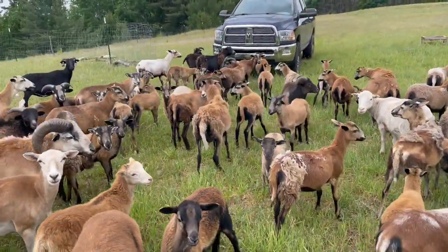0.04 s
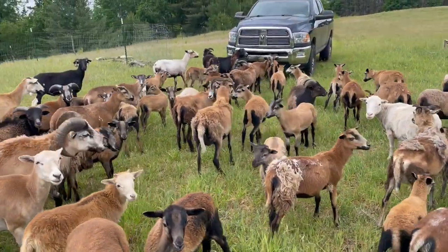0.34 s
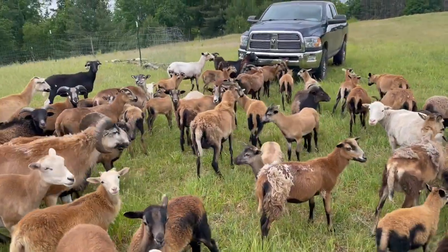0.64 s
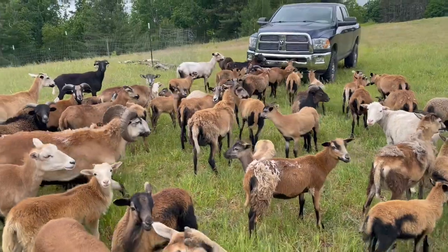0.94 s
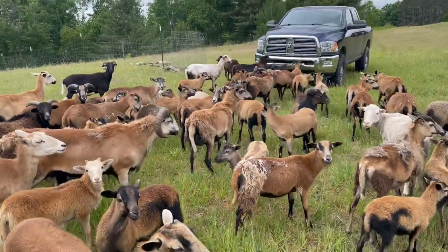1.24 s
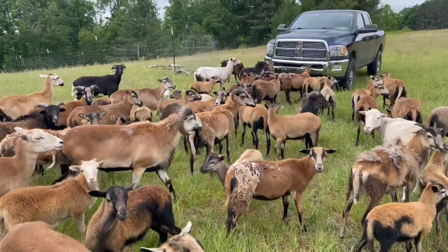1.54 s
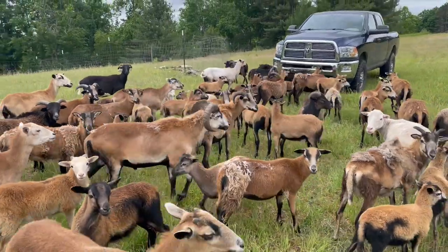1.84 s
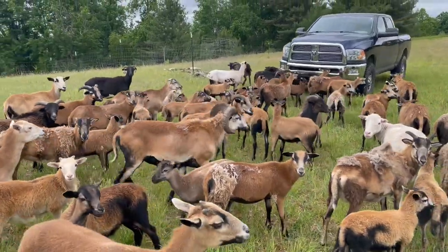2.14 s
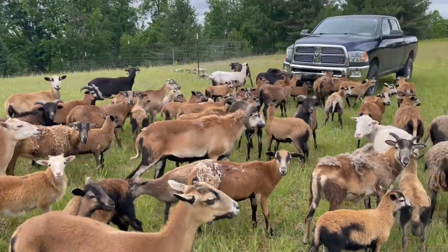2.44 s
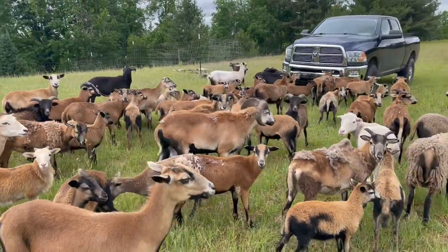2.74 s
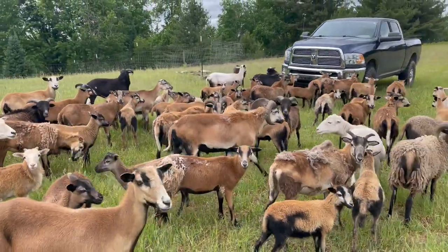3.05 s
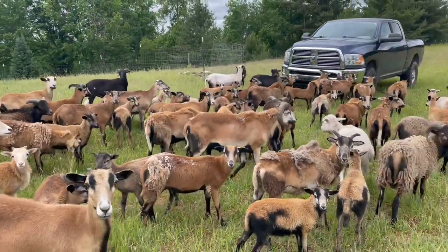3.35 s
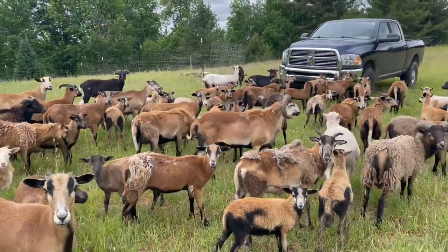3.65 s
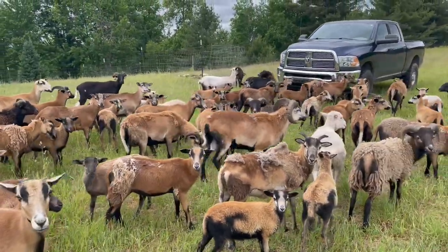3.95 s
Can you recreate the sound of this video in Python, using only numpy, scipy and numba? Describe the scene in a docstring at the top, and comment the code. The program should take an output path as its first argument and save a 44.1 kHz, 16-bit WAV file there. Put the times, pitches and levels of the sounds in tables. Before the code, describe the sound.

Sheep call across an open field as wind buffets the microphone lightly. Smooth and hoarse bleats come first, with distant grunts and a lamb, before a near ewe gives a loud, wavering baa and a far lamb answers faintly.

```python
"""A pasture with a flock of sheep. A near ewe gives a loud, quavering baa and a far lamb answers.
Before that, a ewe bleats two smooth held notes, one fading and one arching, a hoarse ewe rasps, a lamb
stutters and grunts come from further back. Each voice is a train of vocal-fold pulses ringing a throat.
Wind flutters on the microphone in small eddies, over a faint background hiss."""
import sys
import numpy as np
from scipy import signal
from scipy.fft import rfft, irfft
from scipy.io import wavfile
from scipy.ndimage import uniform_filter1d
from numba import njit

SR = 44100
rng = np.random.default_rng(int(sys.argv[2]) if len(sys.argv) > 2 else 0)


def wrap_up_sound(samples):
    """Save the sound to the file named by the first command line argument, as 16-bit audio."""
    columns = np.atleast_2d(samples).T
    # keep every value between -1 and 1, then stretch to whole-number steps
    tamed = np.clip(columns, -1, 1)
    steps = np.round(tamed * 32767).astype(np.int16)
    wavfile.write(sys.argv[1], SR, steps)


N = 176400
t = np.arange(N) / SR
BIN_HZ = np.arange(N // 2 + 1) * SR / N

# near and hoarse ewes' quavers: t/s, starting f/Hz, final f/Hz, level/dB, brightness/dB, softening/dB
NEAR_QUAVERS = [(2.995, 140.2, 166.8, -37.5, -6.5, -5), (3.038, 180.5, 168.5, -41.5, 6.5, 7),
                (3.08, 179.2, 214.6, -32, -8, 5), (3.115, 168, 223.8, -34, -1, 16),
                (3.212, 181.9, 221.9, -31, -3.5, 10), (3.285, 202.6, 208.8, -30, -9.5, 7),
                (3.318, 185, 222.7, -30.5, -6.5, 7), (3.385, 191, 223.4, -30.5, -7, 5.5),
                (3.462, 184, 215.4, -31, -5.5, 4.5), (3.54, 179.6, 203.2, -34, -5, 0.5),
                (3.63, 165.3, 175, -37, -6.5, -7)]
HOARSE_QUAVERS = [(.113, 147.2, 127, -34, -7, -2), (.185, 128.1, 126.4, -37.5, -6, 6),
                  (.235, 170.4, 166, -39, -11.5, -1), (.282, 167.9, 180.7, -34, -11, -2.5),
                  (.33, 177.5, 167.2, -36.5, -7, 4), (.4, 162.9, 173.6, -37.5, -8.5, 3.5),
                  (.513, 135.9, 112, -41, -4.5, 3)]
# near ewe's mouth: t/s, first formant f/Hz, second formant f/Hz, mid level/dB, treble level/dB
NEAR_MOUTH = [(3.0, 810, 1560, -5, -13.5), (3.14, 740, 1890, -3.5, -11), (3.25, 806, 1904, -2, -4),
              (3.38, 815, 1850, -4, -2.5), (3.46, 850, 1585, -7.5, -2), (3.66, 779, 1649, -6, -1)]
# throat EQ of the near ewe, the smooth bleats and the lamb: f/Hz, level/dB
NEAR_THROAT = [(250, -18), (620, -0.5), (1250, -9.5), (2300, -11), (2900, 4), (3450, -4), (3900, -15.5),
               (4300, -7), (4750, -12), (5300, -9.5), (7200, -22), (8300, -32), (11500, -22.5),
               (15000, -52)]
SMOOTH_THROAT = [(150, -33.5), (440, -16.5), (595, 3), (745, -14.5), (1150, -29.5), (1490, -26.5),
                 (1850, -43), (2200, -36.5), (2430, -20), (2720, -31), (3050, -25.5), (3700, -34),
                 (4500, -43.5), (8000, -60)]
LAMB_THROAT = [(260, -6.5), (520, 1), (790, -11), (1050, 2.5), (1320, 2), (1600, -17), (2100, -16),
               (2700, -8.5), (3200, -12.5), (7200, -24), (9000, -71)]
# hoarse ewe's formants: f/Hz, width/Hz, level/dB
HOARSE_FORMANTS = [(701, 172, 2), (1876, 110, -6.5), (2987, 380, -9.5), (3650, 150, -12),
                   (4520, 340, -17.5)]
# fading bleat: t/s, f/Hz, level/dB
FADING_NOTE = [(0, 147.2, -23), (.11, 149.5, -27), (.2, 153.3, -33.5), (.28, 156, -40), (.35, 149.6, -90)]
# arching bleat: t/s, f/Hz, level/dB, mouth opening/0-1
ARCHING_NOTE = [(1.532, 137.5, -46, 0), (1.599, 139.9, -45.5, 0.3), (1.623, 143.2, -32.5, 0.7),
                (1.655, 145.2, -30, 1), (1.75, 149.4, -30.5, 0.88), (1.849, 148.5, -34, 0.71),
                (1.949, 146.1, -33, 0.37), (2.085, 135, -41, 0.53), (2.13, 128.2, -72, 0.61)]
# the lambs' syllables: t/s, length/s, f/Hz, level/dB
LAMB_SYLLABLES = [(1.963, 0.049, 266.8, -40), (2.051, 0.047, 265.9, -35), (2.137, 0.044, 261.8, -35.5),
                  (2.224, 0.045, 254.6, -37), (2.309, 0.052, 252.7, -38.5)]
FAR_LAMB_SYLLABLES = [(3.697, 0.071, 279.3, -48.5), (3.782, 0.067, 275.6, -51.5), (3.863, 0.054, 273, -54)]
# far lamb's formants: f/Hz, level/dB
FAR_LAMB_FORMANTS = [(1070, 0.5), (2650, -13), (4080, -11), (5450, -7.5)]
# distant grunts: t/s, length/s, pitch f/Hz, level/dB, formant f/Hz, creak/0-1
GRUNTS = [(1.335, 0.071, 116, -49, 890, 0.94), (1.416, 0.053, 90, -50, 880, 0.97),
          (1.451, 0.068, 134.3, -43.5, 860, 0.2), (2.887, 0.12, 141, -54.5, 1350, 0.8)]
# gust envelope: t/s, relative level/dB
GUSTS = [(.09, -40.5), (.13, -35), (.45, -38), (.79, -40), (.93, -33.5), (1.06, -44), (1.8, -43),
         (2.25, -46), (2.55, -44.5), (2.85, -53.5), (3.34, -37.5), (3.48, -48), (3.8, -37), (3.88, -44),
         (3.97, -41.5)]
# strongest wind buffets: t/s, peak level/dB, nominal f/Hz
BUFFETS = [(0.109, -19, 500), (.147, -23.5, 516), (0.23, -18, 400), (.425, -20.5, 420), (0.722, -22.5, 456),
           (.741, -31, 805), (0.913, -23.5, 660), (.938, -27.5, 443), (.957, -26.5, 760),
           (.982, -28.5, 730), (1.03, -33.5, 472), (1.052, -32.5, 560), (1.101, -24, 540),
           (1.156, -29.5, 483), (1.287, -31, 426), (2.46, -25.5, 474), (2.541, -24.5, 433),
           (2.636, -32, 400), (2.666, -29.5, 490), (3.323, -22.5, 398), (3.37, -20, 337), (3.727, -28, 398),
           (3.779, -28.5, 540), (3.94, -28, 600)]
# EQ of the wind rumble: f/Hz, level/dB
RUMBLE_EQ = [(20, -44), (50, 1), (120, -0.5), (200, -12), (700, -25.5), (2000, -74.5)]
# faint background hiss, with a narrow gap near 8 kHz: f/Hz, level/dB
HISS_EQ = [(300, 11.5), (1000, -1.5), (7300, -4.5), (7900, -37), (9300, -2.5), (11000, 0), (13300, -4),
           (14500, -13)]
# hiss envelope: t/s, relative level/dB
HISS_ENVELOPE = [(0, -53), (2.58, -54.5), (2.68, -58.5), (4, -56.5)]


def near_ewe(end_s=3.697, release_s=0.0061, ragged_s=0.2):
    """The lead baa: sharp pulses, ragged at first, ring a throat whose formants follow the mouth."""
    hz, level, brightness = quavering(NEAR_QUAVERS, end_s)
    ragged = np.clip(1 - (t - NEAR_QUAVERS[0][0]) / ragged_s, 0, 1)
    pulses = vocal_folds(hz, jitter=.008 + .06 * ragged, shimmer_db=1.3 + 2 * ragged, air=.28)
    first_hz, second_hz, mid_db, treble_db = curves(NEAR_MOUTH)
    voice = colour(pulses, NEAR_THROAT)
    voice += undb(15) * bandpass(voice, first_hz, width_hz=120.)
    voice += undb(12.5) * bandpass(voice, second_hz, width_hz=130.)
    low, mid, bite, treble = map(unit, crossover(voice, edges_hz=(1200, 2350, 3950)))
    voice = low + undb(mid_db) * mid + brightness * (bite + undb(treble_db) * treble)
    release = np.clip((end_s - t) / release_s, 0, 1)
    return pan(voice * level * release, lead_ms=0.055, treble_db=5)


def fading_bleat():
    """A smooth held note that dies away."""
    hz, db = curves(FADING_NOTE)
    return pan(smooth_voice(hz, mouth_hz=1517.) * undb(db), lead_ms=0.08, treble_db=15.5)


def arching_bleat():
    """A smooth note that rises and falls; its low formant comes in as the mouth opens."""
    hz, db, opening = curves(ARCHING_NOTE)
    start, end = ARCHING_NOTE[0][0], ARCHING_NOTE[-1][0]
    voice = smooth_voice(hz, mouth_hz=1397.)
    voice -= (1 - opening) * bandpass(voice, np.full(N, 590.), width_hz=160.)
    return pan(voice * undb(db) * gate(start, end - start), lead_ms=0.056, treble_db=4)


def hoarse_ewe(end_s=0.591, release_s=0.071):
    """Rough, breathy pulses make a low rasp that cuts in over the fading note in bursts."""
    hz, level, brightness = quavering(HOARSE_QUAVERS, end_s)
    pulses = vocal_folds(hz, jitter=0.028, shimmer_db=2.8, air=0.55)
    body, *upper = (undb(db) * formant(pulses, f, width) for f, width, db in HOARSE_FORMANTS)
    fill = undb(-22) * formant(pulses, hz=1190, width_hz=1820)
    rasp = unit(body) + brightness * unit(sum(upper) + fill)
    release = np.clip((end_s - t) / release_s, 0, 1)
    return pan(rasp * level * release, lead_ms=0.042, treble_db=4)


def lamb():
    """A high, breathy bleat chopped into syllables, each sagging in pitch."""
    hz, level = syllables(LAMB_SYLLABLES, glide_hz_per_s=-223)
    pulses = vocal_folds(hz, jitter=0.0123, shimmer_db=1.5, air=0.6)
    return pan(unit(colour(pulses, LAMB_THROAT)) * level, lead_ms=.14, treble_db=11)


def far_lamb():
    """A thin, clear answer whose syllables rise through narrow formants."""
    hz, level = syllables(FAR_LAMB_SYLLABLES, glide_hz_per_s=230)
    pulses = vocal_folds(hz, jitter=.003, shimmer_db=1, air=.15)
    voice = sum(undb(db) * formant(pulses, f, width_hz=250) for f, db in FAR_LAMB_FORMANTS)
    return pan(unit(voice) * level, lead_ms=0, treble_db=12)


def grunts():
    """Short calls from the back of the flock; creak makes the pulses uneven and sharp."""
    calls = np.zeros(N)
    for start, length, hz, db, throat_hz, creak in GRUNTS:
        pulses = vocal_folds(np.full(N, hz), jitter=.05 * creak, shimmer_db=2, air=0.1)
        body = formant(pulses, throat_hz, width_hz=220)
        grit = 0.18 * creak * formant(pulses, hz=1440, width_hz=1550)
        calls += unit(body + grit) * undb(db) * gate(start, length)
    return pan(calls, lead_ms=0, treble_db=8)


def vocal_folds(hz, jitter, shimmer_db, air):
    """Pulses that waver in pitch and level, each followed by a puff of breath."""
    cycles = np.cumsum(hz * np.clip(1 + jitter * wobble(180), .2, 2)) / SR
    closures = np.interp(np.arange(int(cycles[-1])), cycles, np.arange(N))
    taps = closures.astype(int)[:, None] + np.arange(-7, 9)
    offset = taps - closures[:, None]
    clicks = np.sinc(offset) * np.sinc(offset / 8)  # band-limited, timed between samples
    pulses = np.bincount(taps.ravel() % N, clicks.ravel(), N)
    breath = np.diff(signal.lfilter([1], [1, -np.exp(-1 / 4)], rng.standard_normal(N + 1)))
    puffs = np.exp(-(cycles % 1) / 1.9) * breath
    return (unit(pulses - pulses.mean()) + air * unit(puffs)) * undb(shimmer_db * wobble(150))


def smooth_voice(hz, mouth_hz):
    """Even pulses through a ewe's throat, with one upper formant set by the mouth."""
    voice = colour(vocal_folds(hz, jitter=0.0039, shimmer_db=1.22, air=0.23), SMOOTH_THROAT)
    return unit(voice + undb(18.5) * bandpass(voice, np.full(N, mouth_hz), width_hz=109.))


def quavering(rows, end_s):
    """Pitch, level and brightness of a baa: each quaver glides, and mellows or brightens."""
    start, first_hz, final_hz, db, bright_db, soften_db = np.array(rows).T
    now = np.maximum(np.searchsorted(start, t) - 1, 0)  # the quaver that is sounding
    progress = np.clip((t - start[now]) / np.diff([*start, end_s])[now], 0, 1)
    hz = first_hz[now] + (final_hz - first_hz)[now] * ease(progress, begin=.16, span=.63)
    level = undb(db[now]) * (t > start[0])
    brightness = undb(bright_db[now] - soften_db[now] * ease(progress, begin=.38, span=.4))
    return [uniform_filter1d(curve, size=400) for curve in (hz, level, brightness)]


def syllables(rows, glide_hz_per_s, arch_hz=9):
    """Pitch and level of a chopped bleat: each syllable arches and glides."""
    hz, level = np.full(N, float(rows[0][2])), np.zeros(N)
    for start, length, pitch, db in rows:
        envelope = gate(start, length)
        from_centre = t - start - length / 2
        bend = glide_hz_per_s * from_centre - arch_hz * (2 * from_centre / length) ** 2
        hz = np.where(envelope > 0, pitch + bend, hz)
        level += envelope * undb(db)
    return hz, level


def wind(eddies_per_s=200, eddy_hz=333.5, eddy_s=0.0029, buffet_s=0.0019):
    """Eddies crowd past the microphone over a rumble; stronger gusts bring smaller, brighter ones."""
    gust_db, = curves(GUSTS)
    swell_db = gust_db - gust_db.mean()
    eddies, buffets = np.zeros(2 * N), np.zeros(2 * N)
    for (when, db, hz), phase in zip(BUFFETS, rng.random(len(BUFFETS))):
        i = int((when - buffet_s / 2) * SR)
        swirl = undb(db) * eddy(hz, buffet_s, phase)
        buffets[i:i + len(swirl)] += swirl
    rumble, side_rumble = (noise(RUMBLE_EQ) * undb(-41 + 0.62 * swell_db) for _ in range(2))
    for position, weakness, pitch, phase in rng.random((int(eddies_per_s * N / SR), 4)):
        i = int(position * N)
        hz = eddy_hz * 2 ** (1.7 * (pitch - .5) + 0.033 * swell_db[i])
        swirl = undb(-18 * weakness) * eddy(hz, eddy_s * np.sqrt(eddy_hz / hz), phase)
        eddies[i:i + len(swirl)] += swirl
    flutter = unit(eddies[:N]) * undb(gust_db + 2.5)
    side_flutter = unit(formant(rng.standard_normal(N), hz=224, width_hz=217)) * undb(gust_db)
    side = undb(-10.5) * (side_rumble + side_flutter)
    return flutter + buffets[:N] + rumble + np.array([side, -side])


def eddy(hz, rise_s, phase):
    """A brief swirl of pressure that drops in pitch as it dies."""
    age = np.arange(2000) / SR / rise_s
    envelope = (age * np.exp(1 - age)) ** 1.8
    cycles = hz * rise_s * 2.43 * (1 - np.exp(-age / 2))
    return envelope * np.sin(2 * np.pi * (phase + cycles))


def hiss():
    """A faint, slightly restless background bed."""
    centre, left, right = (noise(HISS_EQ) for _ in range(3))
    bed = pan(centre, lead_ms=0.021, treble_db=0.5) + .5 * np.array([left, right])
    db, = curves(HISS_ENVELOPE)
    return bed * undb(db + 2.32 * wobble(7.7))


def undb(db):
    return 10 ** (np.asarray(db) / 20)


def unit(x):
    return x / np.sqrt(np.mean(x ** 2))


def curves(rows):
    """Automation lanes: each column joined by straight lines in time."""
    times, *columns = np.array(rows, float).T
    return [np.interp(t, times, column) for column in columns]


def gate(start, length, fade_s=0.0089):
    return np.clip(np.minimum(t - start, start + length - t) / fade_s, 0, 1)


def ease(progress, begin, span):
    return np.sin(np.pi / 2 * np.clip((progress - begin) / span, 0, 1)) ** 2


def wobble(rate_hz):
    """Smooth random modulation at unit RMS."""
    hold = max(int(SR / rate_hz), 1)
    steps = rng.standard_normal(N)[np.arange(N) // hold]
    return unit(uniform_filter1d(uniform_filter1d(steps, hold), hold))


def noise(eq):
    return unit(colour(rng.standard_normal(N), eq))


def colour(x, eq):
    """Minimum-phase EQ through points of f/Hz, level/dB."""
    hz, db = np.array(eq, float).T
    gain = undb(np.interp(np.log(np.maximum(BIN_HZ, 1)), np.log(hz), db))
    cepstrum = irfft(np.log(gain), N)
    cepstrum[1:N // 2] *= 2
    cepstrum[N // 2 + 1:] = 0
    return irfft(rfft(x) * np.exp(rfft(cepstrum)), N)


@njit
def bandpass(x, hz, width_hz):
    """A sweepable state-variable band-pass."""
    y, band, low = np.empty(len(x)), 0., 0.
    for i in range(len(x)):
        g, damping = np.tan(np.pi * hz[i] / SR), width_hz / hz[i]
        v = (band + g * (x[i] - low)) / (1 + g * (g + damping))
        band, low = 2 * v - band, low + 2 * g * v
        y[i] = damping * v
    return y


def formant(x, hz, width_hz):
    """A resonance with steep skirts: two band-passes in series."""
    centre = hz + np.zeros(N)
    return bandpass(bandpass(x + 1e-18, centre, float(width_hz)), centre, 3. * width_hz)


def crossover(x, edges_hz):
    """Adjoining bands that add up to the whole, so pulses stay sharp."""
    below = [irfft(rfft(x) / (1 + (BIN_HZ / hz) ** 16), N) for hz in edges_hz]
    return np.diff([np.zeros(N), *below, x], axis=0)


def pan(x, lead_ms, treble_db):
    """Stereo placement: the left side leads a little and gets more of the treble."""
    shelf = undb(treble_db / 2 * BIN_HZ ** 2 / (BIN_HZ ** 2 + 2000 ** 2))
    left = shelf * np.exp(1j * np.pi * BIN_HZ * lead_ms / 1000)
    return irfft(rfft(x) * np.array([left, 1 / left]), N)


def scene(reverb_s=0.099):
    """The flock, lightly scattered by its surroundings, over wind and hiss."""
    flock = fading_bleat() + hoarse_ewe() + arching_bleat() + grunts() + lamb() + near_ewe() + far_lamb()
    scatter = rng.standard_normal((2, N)) * undb(-60 * t / reverb_s)
    scatter /= np.linalg.norm(scatter, axis=1, keepdims=True)
    reverb = signal.fftconvolve(flock, scatter, axes=1)[:, :N]
    return flock + undb(-6) * reverb + wind() + hiss()


def record(dry, low_cut_hz=33, high_cut_hz=14200):
    """Trim the deepest rumble and the very top."""
    low_cut = signal.butter(4, low_cut_hz, "high", fs=SR, output="sos")
    high_cut = signal.ellip(8, .2, 70, high_cut_hz, fs=SR, output="sos")
    return signal.sosfilt(high_cut, signal.sosfilt(low_cut, dry))


dry = scene()
out = record(dry)
wrap_up_sound(out)
```